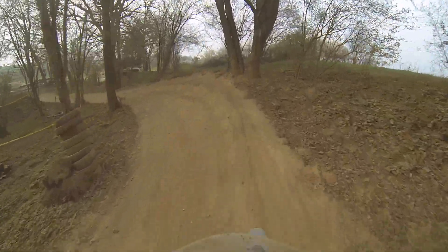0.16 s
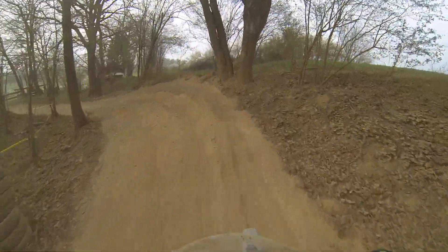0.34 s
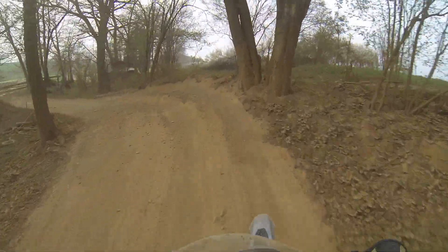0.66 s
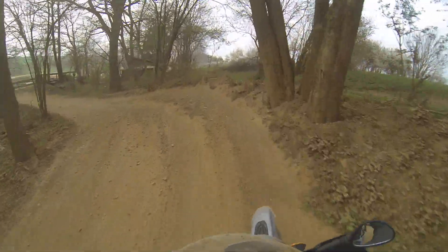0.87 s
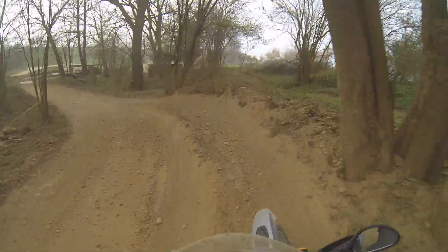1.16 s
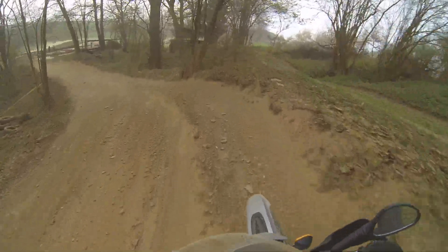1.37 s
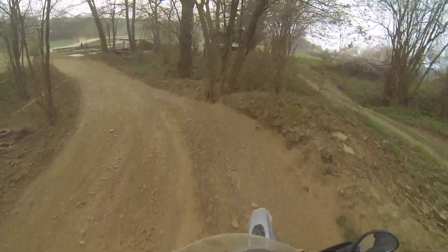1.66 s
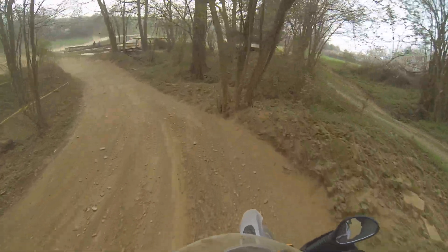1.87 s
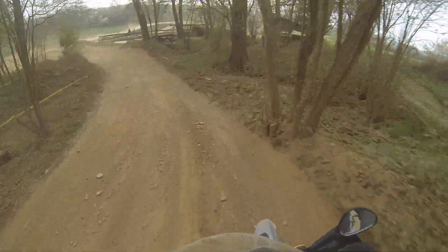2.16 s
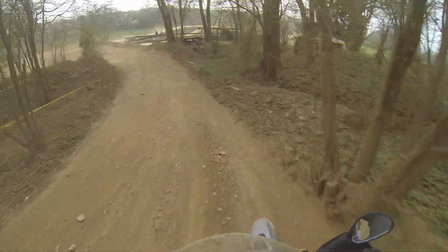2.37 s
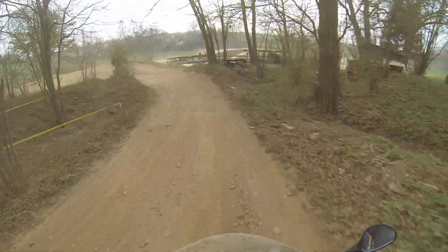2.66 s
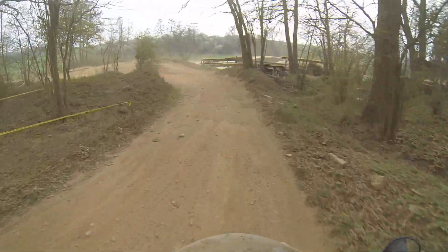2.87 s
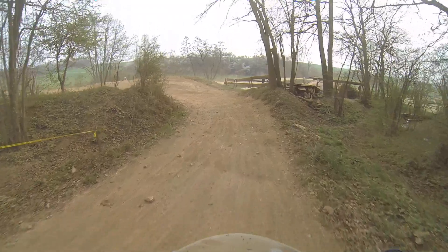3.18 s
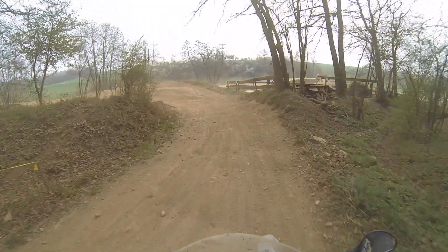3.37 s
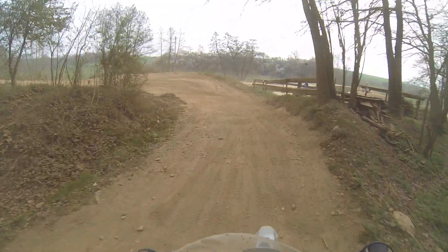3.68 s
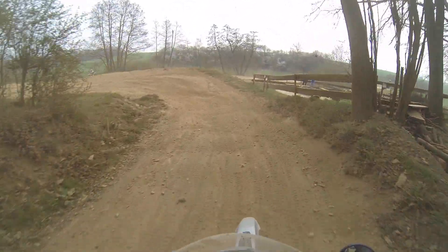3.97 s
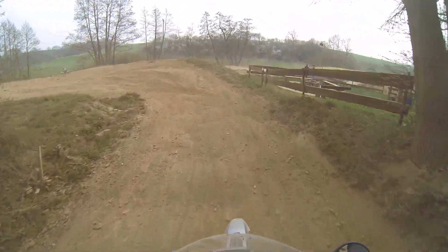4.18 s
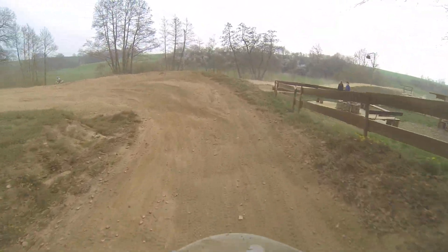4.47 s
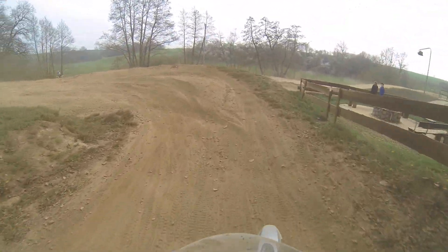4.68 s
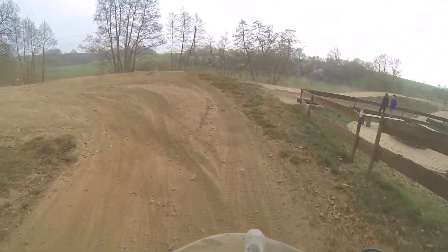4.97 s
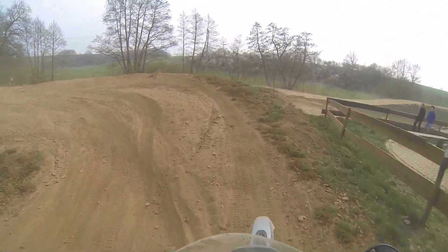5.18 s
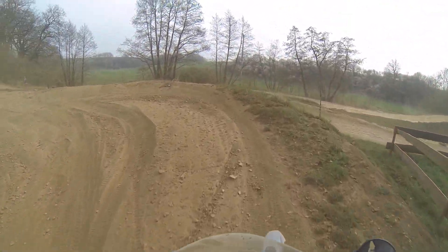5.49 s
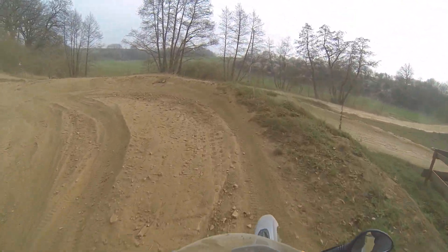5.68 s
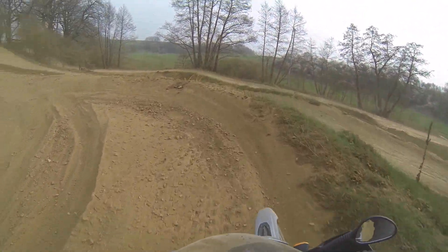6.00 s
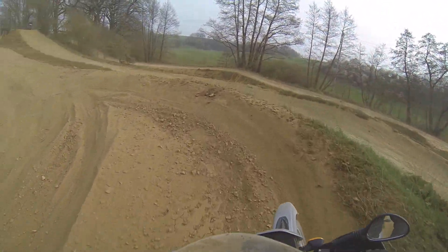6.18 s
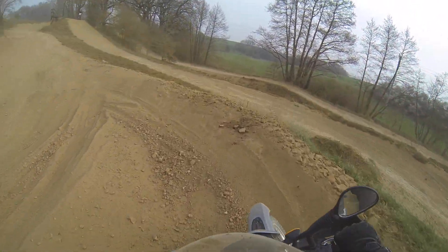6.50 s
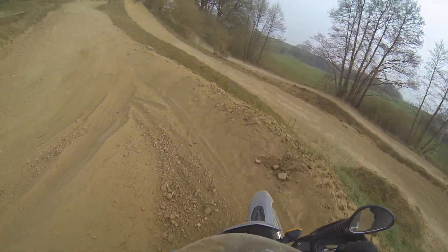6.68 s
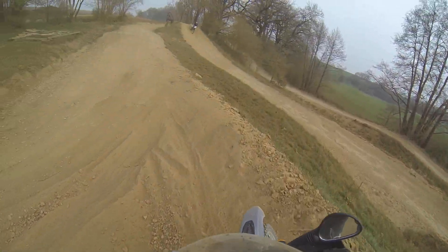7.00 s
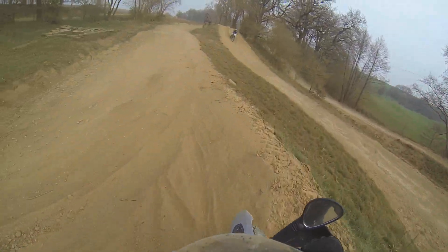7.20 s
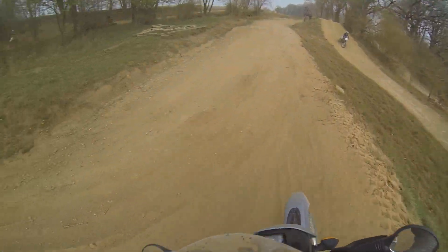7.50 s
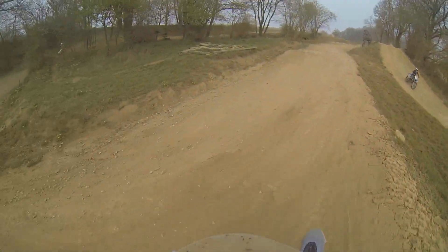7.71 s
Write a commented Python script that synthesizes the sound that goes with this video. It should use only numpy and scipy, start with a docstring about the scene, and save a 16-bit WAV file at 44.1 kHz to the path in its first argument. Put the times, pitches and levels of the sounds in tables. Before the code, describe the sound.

A four-stroke motorcycle on a bumpy dirt track, captured very close through a closed case. Fast uneven exhaust pulses and hollow mechanical rattle rise and fall with the throttle, loudest around three seconds and again at the end. Low thuds and wobbling buffeting come with the bumps, plus slight stone ticks, spray swishes and a few dull knocks.

```python
"""A four-stroke single thumps and barks along a rough dirt track, heard from a helmet camera in a closed case.
Each firing sends pulses through the exhaust resonances and bursts of noise through the bark's;
random taps on the case make the clatter of valve gear, chain and tyres; multiples of the firing rate hum.
Bumps and buffeting swing the camera mount at its own low note. Stones, spray, knocks, pops and tones pass by;
wind and tyre roar and hiss lie behind."""
import sys
import numpy as np
from scipy import signal
from scipy.io import wavfile
from scipy.ndimage import uniform_filter1d

SR = 44100
rng = np.random.default_rng(int(sys.argv[2]) if len(sys.argv) > 2 else 0)


def waveform_to_disk(signal):
    """Save audio, clipped to [-1, 1], as 16-bit WAV at the path in sys.argv[1]."""
    frames = np.transpose(np.atleast_2d(signal))
    scaled = np.clip(frames, -1, 1) * 32767
    samples = np.round(scaled).astype(np.int16)
    wavfile.write(sys.argv[1], SR, samples)


N = 346185

# engine and case levels along the ride: (t/s, exhaust thump level/dB, clatter level/dB)
RIDE = [(0.0, -54, -32), (0.2, -52, -35.5), (0.45, -39.5, -37.5), (1.1, -43.5, -37.5), (1.28, -50.5, -38),
        (1.55, -40.5, -39), (1.78, -57.5, -41), (2.1, -50.5, -41), (2.45, -40, -38.5), (2.75, -30.5, -37),
        (3.1, -31.5, -36.5), (3.4, -29, -34.5), (3.66, -45.5, -35.5), (4.0, -34.5, -34.5),
        (4.18, -47.5, -36.5), (5.2, -45.5, -38), (5.45, -58, -40), (5.9, -51, -42.5), (6.42, -44, -43),
        (6.72, -44.5, -44), (6.89, -36.5, -43.5), (7.07, -39.5, -44), (7.35, -28, -41.5),
        (7.65, -32, -37.5), (7.85, -31, -39.5)]
# colour of the exhaust, gains against the main blow and on the bark:
# (t/s, header/dB, upper silencer note/dB, early blow/dB, echo/dB, extra bark/dB)
EXHAUST = [(0, -4, -3, -15.5, -1, 1), (2.2, -14, 12, -17.5, -16, -1), (2.7, -1, 2.5, -9, -10, -3.5),
           (2.78, -11, 5, -5.5, -18, -0.5), (2.87, -19.5, 8, -5.5, -26, -1.5),
           (3.05, -5, 7.5, -6, -23.5, -1), (3.5, -1.5, -1.5, -16.5, -19.5, -10),
           (5.7, -1, 1, -10, -10.5, -12), (6.3, 5, 3.5, -8, -22, 17), (7.2, 0.5, -12.5, -0.5, -13, -1),
           (7.33, -7, 2.5, -5, -5.5, -3), (7.6, -17.5, 7.5, -22, -6.5, 3), (7.7, -11.5, 6.5, -7, -6, 7),
           (7.85, -19, 3.5, -14, -6.5, 4.5)]
MID_FIRING = 25  # firings per s at which the bark and putt levels are stated
BLOW_LEAD_S = .008  # a blow starts this long before its nominal peak


def engine():
    """Slightly uneven firings drive the exhaust and bark; clatter and frame hum run all cycle long."""
    # engine speed: (t/s, firing rate f/Hz)
    firing = [(0.0, 28.83), (0.4, 29.17), (0.84, 28.13), (1.05, 25.61), (1.3, 25.59), (1.52, 23.85),
              (1.77, 20.28), (2.0, 19.34), (2.2, 20.23), (2.33, 24.87), (2.4, 25.8), (2.5, 24.75),
              (2.65, 25.85), (2.8, 29.3), (2.96, 31.7), (3.14, 30.67), (3.27, 32.51), (3.4, 34.46),
              (3.52, 33.27), (3.7, 28.8), (3.94, 32.38), (4.12, 29.93), (4.31, 27.71), (4.6, 28.22),
              (4.88, 28.56), (5.28, 26.49), (5.7, 23.62), (6.06, 22.34), (6.21, 22.65), (6.44, 16.82),
              (6.6, 18.7), (6.9, 18.67), (7.1, 17.14), (7.22, 17.72), (7.32, 19.92), (7.4, 21.94),
              (7.5, 22.87), (7.57, 22.96), (7.67, 23.33), (7.8, 26.9), (7.85, 30.47)]
    start_cycle = .157  # cycles past a firing at the start
    rate = curves(firing)[0]
    cycle = start_cycle + np.cumsum(rate) / SR
    at = np.flatnonzero(np.diff(np.floor(cycle)))
    timing, blow_chance, bark_chance = rng.standard_normal((400, 3))[:len(at)].T
    times = at / SR + .0001 * timing
    blow_size, bark_size = undb(.7 * blow_chance), undb(1.6 * bark_chance)
    return (thump(times, at, rate, blow_size) + putt(times, rate, blow_size)
            + bark(times, at, rate, bark_size) + clatter() + frame_hum(cycle))


def thump(times, at, rate, size):
    """The header rings near the firing; blows, early, main and echoed, sound the silencer and a low body."""
    # delay of the blow's echo: (t/s, delay/s)
    echo_delay = [(7.2, 0.018), (7.35, .0177), (7.55, .0177), (7.65, 0.019)]
    # brief ring of the header: (f/Hz, width/Hz, level/dB)
    header_modes = [(338, 64, -1.5)]
    # low body of the blow: (f/Hz, width/Hz, level/dB)
    boom_modes = [(133, 37, -7)]
    blow_cycle, header_lead_s = .31, .0021  # peak of the blow in cycles; header's lead on the firing
    header_gain, upper, early, echo, _ = undb(curves(EXHAUST))
    blown = times + blow_cycle / rate[at] - BLOW_LEAD_S
    main_blow = clicks(blown, size)
    echoed = clicks(blown + curves(echo_delay)[0][at], size * echo[at])
    early_blow = clicks(times - .004, size * early[at])
    silencer = swollen(main_blow + echoed + early_blow, upper)
    header = ring(ring(clicks(times - header_lead_s, -size), header_modes), header_modes)
    boom = ring(ring(main_blow, boom_modes), [(138, 51, .0098)])
    return level(silencer + header_gain * dull(header, 494) + boom, 0) * undb(curves(RIDE)[0])


def swollen(x, upper):
    """The silencer turns a blow into a soft-edged burst of its two notes."""
    # silencer notes, lower then upper: (f/Hz, width/Hz, level/dB)
    silencer_notes = [(222, 124, 1), (256.7, 42, -5)]
    notes = ring(x, silencer_notes[:1]) + ring(x * upper, silencer_notes[1:])
    return ring(ring(notes, [(237.6, 72, .0036)]), [(232, 360, .0036)])


def putt(times, rate, size):
    """The tail pipe resonates just after every firing, whatever the load."""
    # tail pipe: (f/Hz, width/Hz, level/dB)
    pipe = [(344.6, 59, 0)]
    putt_db, db_per_firing = -55.5, .13  # level at MID_FIRING; slope in dB per firing per s
    pulses = ring(ring(clicks(times + .00682, size), pipe), pipe)
    return level(pulses, 0) * undb(putt_db + db_per_firing * (rate - MID_FIRING))


def bark(times, at, rate, force):
    """Under load, gas rushes up to two cracks a firing; shock and noise excite bright resonances."""
    # the two cracks: (t/s, lag of the first on the firing/s, gap to the second/s, second level/dB)
    cracks = [(5.5, .0005, .0075, 0), (6.3, .001, .01, -12), (7.5, .001, .01, -12), (7.62, -.001, .01, -12),
              (7.73, -.001, .01, -12), (7.78, .0005, .01, -12)]
    # resonances of the bark: (f/Hz, width/Hz, level/dB)
    bark_modes = [(1048, 142, 6.5), (1506, 100, 10.5), (1990, 263, 2), (2810, 384, 1), (3810, 117, -1.5),
                  (4800, 820, -17)]
    # bright edge of the bark: (f/Hz, width/Hz, level/dB)
    edge_modes = [(6900, 840, -3), (9500, 3000, -12.5), (11800, 1800, -9.5)]
    full_load_db = -30  # thump level that counts as full load
    # bark at full load and MID_FIRING, before the extra bark; slopes per dB of thump, per firing per s
    base_db, db_per_db, db_per_firing = -35, 2.26, -.63
    snap_db, rush_db, edge_db = 15, -13, -29.5  # shock and rush against the gas; edge against the bark
    rush_s = .013  # run-up of the gas to the first crack
    thump_db = curves(RIDE)[0]
    bark_db = base_db + db_per_db * (thump_db - full_load_db) + db_per_firing * (rate - MID_FIRING)
    extra = undb(curves(EXHAUST)[4])
    lag, gap, second_db = (c[at] for c in curves(cracks))
    first = times + lag
    burst = clicks(first, force) + clicks(first + gap, force * undb(second_db))
    ramp = np.linspace(0, 1, int(rush_s * SR))
    rush = undb(rush_db) * np.convolve(clicks(first - rush_s, force), ramp)[:N]
    gas, edge_gas = rng.standard_normal((2, N))
    # two tails in a row give a soft attack and a slower decay
    puff = fade(fade(burst, .0008), .005) / (.0008 * SR)
    body = level(ring((puff + rush) * gas + undb(snap_db) * burst, bark_modes), 0)
    edge = ring(fade(fade(burst, .0005), .0025) * edge_gas, edge_modes)
    return (thin(body, 900) + level(edge, edge_db)) * extra * undb(bark_db)


def clatter():
    """Tiny taps of scattered size ring the case; each panel rattles up and dies down alone."""
    # panels of the case: (f/Hz, width/Hz, level/dB)
    case = [(320.5, 25.4, 3.5), (483, 63, -3.5), (633, 38, -0.5), (834, 118, -2.5), (1100, 117, 2),
            (1405, 91, -1), (1557, 61.4, 2), (1900, 262, -6), (2683, 490, -11.5), (3670, 480, -15.5),
            (5220, 430, -26.5), (6560, 590, -28)]
    scatter_db = 1.3 * rng.exponential(size=N // 40 + 1).repeat(40)[:N]
    taps = rng.standard_normal(N) * undb(scatter_db)
    out = np.zeros(N)
    for k, mode in enumerate(case):
        rattle_db = 1.46 * walk(16) + 1.84 * walk(4.536)
        panel = ring(taps * undb(rattle_db), [mode])
        out += (-1) ** k * dull(panel, 1.75 * mode[0])
    return level(out, 0) * undb(curves(RIDE)[1])


def frame_hum(cycle):
    """The crank turns twice a firing, so the frame shakes at the 2nd multiple and at higher ones."""
    # sine peaks at multiples of the firing rate: (t/s, 2nd level/dB, 4th level/dB, 5th level/dB)
    frame = [(0.6, -33.5, -40, -52), (1.3, -35, -47, -56), (2.0, -35.5, -44, -53), (2.5, -29, -44, -53),
             (3.0, -39, -43, -41), (3.5, -31.5, -42.5, -45), (4.2, -37.5, -40.5, -58),
             (4.9, -29.5, -38.5, -51), (5.5, -35.5, -44.5, -56), (6.0, -38, -45.5, -48),
             (6.6, -39, -44, -39.5), (7.1, -42, -52, -49), (7.5, -41, -53, -48), (7.85, -38, -48, -44)]
    third_db, wander_db = -11, 1.5  # 3rd multiple against the 4th; random wander of each
    second, fourth, fifth = curves(frame)
    orders = zip((2, 3, 4, 5), (second, fourth + third_db, fourth, fifth))
    return sum(undb(db + wander_db * walk(6.0)) * np.sin(2 * np.pi * k * cycle) for k, db in orders)


def mount():
    """Buffeting sways the mount; each bump throws it to one side and it rings down at its own note."""
    # resonances of the mount, main note first: (f/Hz, width/Hz, level/dB)
    mount_modes = [(38.5, 5, 0), (18, 12, -6)]
    # buffeting between bumps, before the low-passes: (t/s, level/dB)
    shake = [(0.0, -21), (0.3, -23.5), (1.0, -22), (1.5, -21.5), (1.57, -34.5), (1.85, -24.5), (3.05, -25),
             (3.5, -21), (4.1, -22), (4.4, -19), (4.7, -22.5), (5.1, -19.5), (5.39, -21.5), (5.44, -31),
             (5.75, -21), (6.1, -19), (6.27, -22.5), (6.75, -19.5), (6.9, -24.5), (7.15, -20.5),
             (7.55, -21), (7.85, -29)]
    # bumps, before the stops: (t of the tallest swing/s, peak level/dB, ring decay/s)
    bumps = [(0.002, -7.5, 0.029), (0.074, -1.5, 0.074), (0.151, -12.5, .05), (0.593, -9, .05),
             (0.734, -3.5, .03), (0.948, -8, .03), (1.053, -11, .04), (1.109, -11, 0.052),
             (1.138, -11.5, 0.094), (1.368, -3.5, .1), (2.153, -16, .05), (2.551, -18, 0.033),
             (3.2, -12.5, .03), (3.371, -11, 0.034), (3.472, -11, .04), (3.524, -13.5, 0.057),
             (3.65, -11.5, 0.025), (3.776, -5, 0.034), (3.855, -11, 0.046), (3.979, -5.5, .06),
             (4.15, -2, .08), (4.283, -7, 0.063), (4.551, -10, .03), (4.707, -13, .04), (4.763, -14, 0.027),
             (4.901, -14, 0.023), (5.273, -11, 0.037), (5.356, -11.5, 0.027), (5.401, -10.5, 0.013),
             (5.519, -12.5, 0.031), (5.833, -3.5, 0.12), (5.939, -7, .05), (5.965, -5, 0.066),
             (6.33, -12, .04), (6.487, -13, .04), (6.535, -11, .06), (6.587, -11.5, .05),
             (6.67, -11, 0.088), (7.33, -11, 0.063), (7.498, -13, 0.055)]
    stop = 1.1  # amplitude where the swing rounds off near its stops
    wind_up_s, throw_s, throw_share = .022, .009, .3  # build-up; one-sided throw and its share of the peak
    sway = dull(ring(rng.standard_normal(N), mount_modes), 51.2)
    # friction in the mount evens out its swing
    sway /= uniform_filter1d(sway ** 2, int(.08 * SR)) ** .3
    swing = dull(level(sway, 0) * undb(curves(shake)[0]), 53.6)
    t = np.arange(N) / SR
    for s, db, decay in bumps:
        near = slice(max(int((s - .08) * SR), 0), int((s + .5) * SR))
        age = t[near] - s
        swell = np.where(age < 0, np.exp(-(age / wind_up_s) ** 2), np.exp(-np.abs(age) / decay))
        rock = (1 - throw_share) * swell * np.cos(2 * np.pi * mount_modes[0][0] * age)
        throw = throw_share * np.exp(-(age / throw_s) ** 2)
        swing[near] += undb(db) * (rock + throw)
    return dull(stop * np.tanh(swing / stop), 300)


def grit():
    """Stones tick on the guards and spray swishes past: gated noise through bright resonances."""
    # small stones, before the resonances: (t/s, level/dB)
    stones = [(0.425, -56.5), (2.8654, -60), (3.3104, -65), (4.5624, -66), (6.654, -61)]
    # swishes of spray, before a common cut and the resonances: (t/s, length/s, level/dB)
    swishes = [(3.108, 0.2, -50.5), (3.85, 0.11, -48), (4.102, 0.17, -49), (6.465, 0.053, -51)]
    s, db = np.transpose(stones)
    gate = fade(clicks(s, undb(db)), .013)
    t = np.arange(N) / SR
    for at, length, swish_db in swishes:
        gate += undb(swish_db - 12.5) * np.exp(-((t - at) / length) ** 2 * 4)
    modes = [(3530, 580, 27.5), (7040, 700, 12.0), (9050, 1400, 7.0), (12500, 2500, -38)]  # Hz, Hz, dB
    return ring(gate * rng.standard_normal(N), modes)


def hits():
    """Two dull knocks on the case and a hard crack of the exhaust bark at 2.866 s: each a click in one wide,
    quickly dying resonance."""
    # knocks on the case and a crack of the bark, before the low-pass: (t/s, nominal peak level/dB, pitch f/Hz)
    hit_list = [(4.978, -23, 620), (6.501, -19, 1700), (2.866, -19, 1100)]
    out = np.zeros(N)
    for s, db, hz in hit_list:
        width = hz / 3
        click = clicks([s], undb(db) * SR / (2 * np.pi * width))  # scaled by the ring's peak
        out += dull(ring(click, [(hz, width, 0)]), 2 * hz)
    return out


def pops():
    """Lone soft blows through the silencer with the throttle shut, scaled by a reference blow's peak."""
    # pops: (t/s, level against the reference blow/dB)
    lone_pops = [(5.365, -34), (5.483, -33), (5.602, -33), (5.686, -33)]
    s, db = np.transpose(lone_pops)
    reference = swollen(clicks([0], .84), .99).max()
    return swollen(clicks(s - BLOW_LEAD_S, undb(db)), 1.) / reference


def tones():
    """Soft-edged narrow bands of noise, over steady sines of a faint high electrical whine."""
    # a squeak, drones and a rasp, level before the soft edges: (t/s, length/s, f/Hz, width/Hz, level/dB)
    narrow_bands = [(7.13, .09, 6750, 60, -66), (6.47, .2, 640, 25, -50), (4.8, .07, 960, 25, -43),
                    (4.85, .05, 905, 25, -43), (2.838, .06, 1900, 300, -37)]
    # electrical whine: (f/Hz, RMS level/dB)
    whine = [(10600, -88), (10643, -87), (10691, -91), (10788, -90), (10837, -88), (10885, -91)]
    t = np.arange(N) / SR
    # +3 dB turns the RMS level of a sine into its peak
    out = sum(undb(db + 3) * np.sin(2 * np.pi * (hz * t + rng.random())) for hz, db in whine)
    for at, length, hz, width, db in narrow_bands:
        band = ring(ring(rng.standard_normal(N), [(hz, width, 0)]), [(hz, 2 * width, 0)])
        out += np.exp(-(2 * (t - at) / length) ** 4) * level(band, db)
    return out


def roar():
    """Wind and tyre noise in half-octave steps, and air hiss past the case, rise with the clatter and flicker."""
    # relative spectrum of the roar: (f/Hz, level/dB)
    bed = [(35, -28), (60, -10.5), (91, -22), (156, -21.5), (320, -30.5), (408, -35.5), (725, -43),
           (1080, -26), (1270, -34), (1560, -33), (3860, -51.5), (5020, -73), (8490, -120)]
    bed_db, hiss_db = -41, -70.5  # before following the clatter
    hz, db = np.transpose(bed)
    out = np.zeros(N)
    for centre in 60 * 2 ** np.arange(0, 7, .5):
        band_db = np.interp(np.log(centre), np.log(hz), db) + .5 * walk(4.2)
        mode = [(centre, centre / 2, 0)]
        out += undb(band_db) * ring(ring(rng.standard_normal(N), mode), mode)
    clatter_db = curves(RIDE)[1]
    rise_db = clatter_db - clatter_db.mean()
    hiss = ring(rng.standard_normal(N), [(6500, 2100, -4.0), (10700, 6300, 0.0)])
    return level(out, bed_db) * undb(1.14 * rise_db) + level(hiss, hiss_db) * undb(.58 * rise_db + walk(24))


def undb(db):
    """Decibels to amplitude."""
    return 10 ** (np.asarray(db) / 20)


def level(x, db):
    """Scale to an RMS level in dB."""
    return x * undb(db) / np.sqrt(np.mean(x ** 2))


def curves(table):
    """The columns of a table after its times, one interpolated value a sample."""
    s, *columns = np.transpose(table)
    return [np.interp(np.arange(N) / SR, s, c) for c in columns]


def ring(x, modes):
    """Sum of resonances (Hz, width Hz, dB), neighbours in opposite phase."""
    out = 0
    for k, (hz, width, db) in enumerate(modes):
        b, a = signal.iirpeak(hz, hz / width, fs=SR)
        out = out + (-1) ** k * undb(db) * signal.lfilter(b, a, x)
    return out


def walk(rate):
    """Random levels held 1 / rate s and smoothed twice; spread near 1."""
    k = int(SR / rate)
    held = np.repeat(rng.standard_normal(N // k + 1), k)
    return 1.07 * uniform_filter1d(uniform_filter1d(held, k), k)[:N]


def clicks(seconds, sizes):
    """An impulse at each time."""
    out = np.zeros(N)
    np.add.at(out, np.clip((np.asarray(seconds) * SR).astype(int), 0, N - 1), sizes)
    return out


def fade(x, seconds):
    """Every impulse becomes an exponential tail."""
    return signal.lfilter([1], [1, -np.exp(-1 / (seconds * SR))], x)


def dull(x, hz):
    """Steep low-pass."""
    return signal.sosfilt(signal.butter(4, hz, fs=SR, output="sos"), x)


def thin(x, hz):
    """High-pass."""
    return signal.sosfilt(signal.butter(2, hz, "high", fs=SR, output="sos"), x)


def scene():
    """All sources at the one microphone on the helmet."""
    return (engine() + mount() + grit() + hits() + pops() + tones() + roar())[None]


def record(dry):
    """The camera blocks the slowest swings, softens the top octave and cuts off steeply above it."""
    soft = signal.sosfilt(signal.butter(4, 13800, fs=SR, output="sos"), thin(dry, 5.8))
    top_hz = 15300
    return signal.sosfilt(signal.ellip(8, .2, 70, top_hz, fs=SR, output="sos"), soft)


dry = scene()
out = record(dry)
waveform_to_disk(out)
```